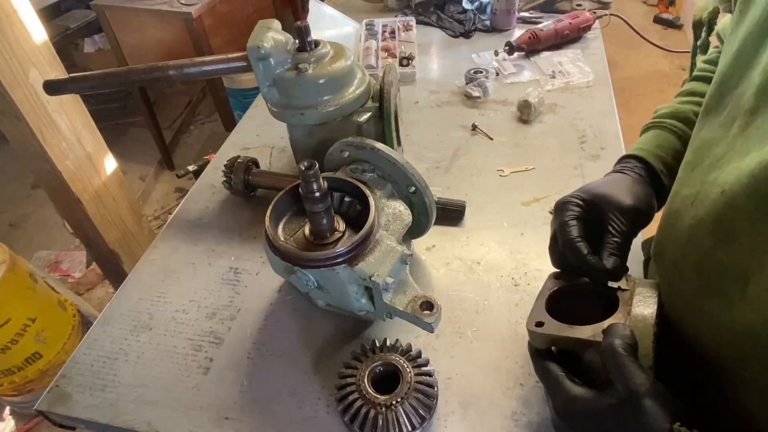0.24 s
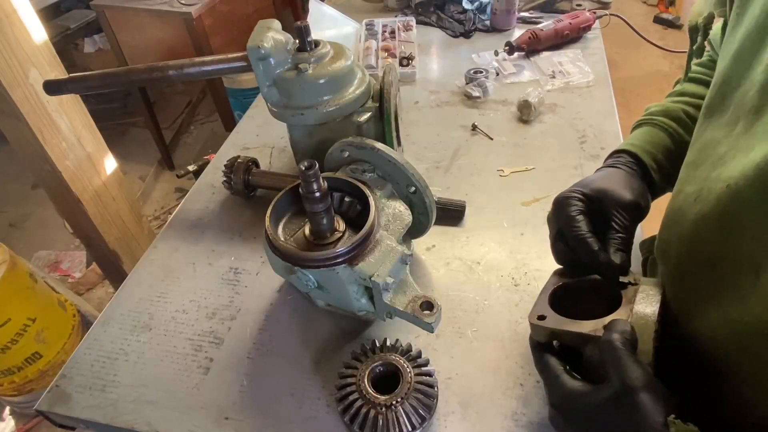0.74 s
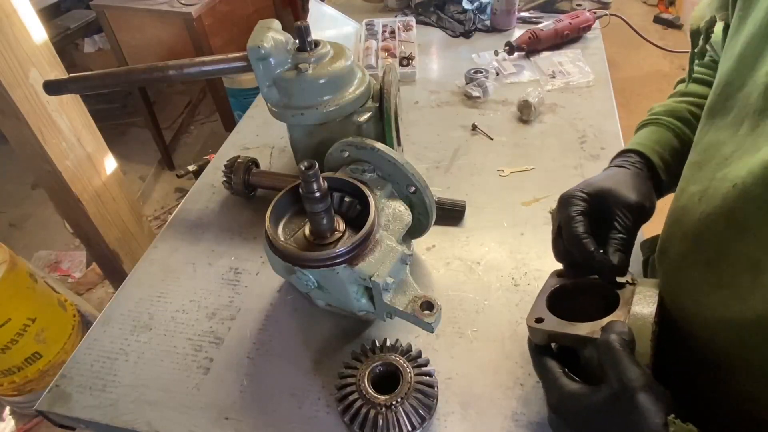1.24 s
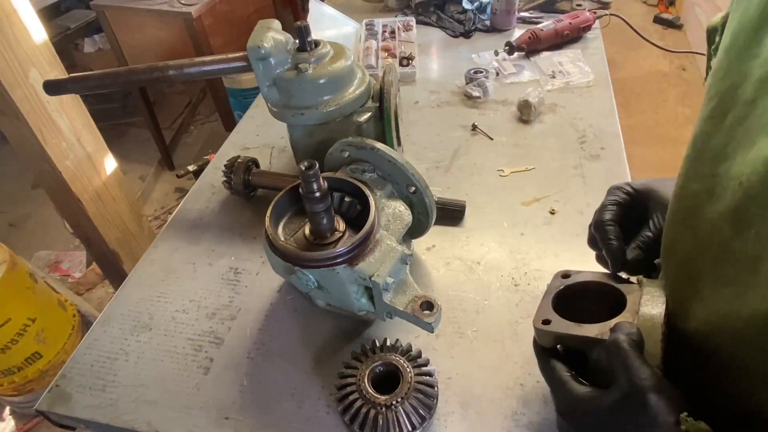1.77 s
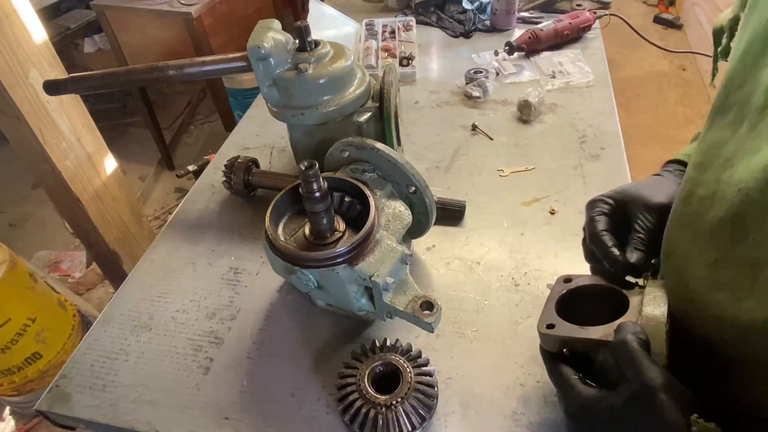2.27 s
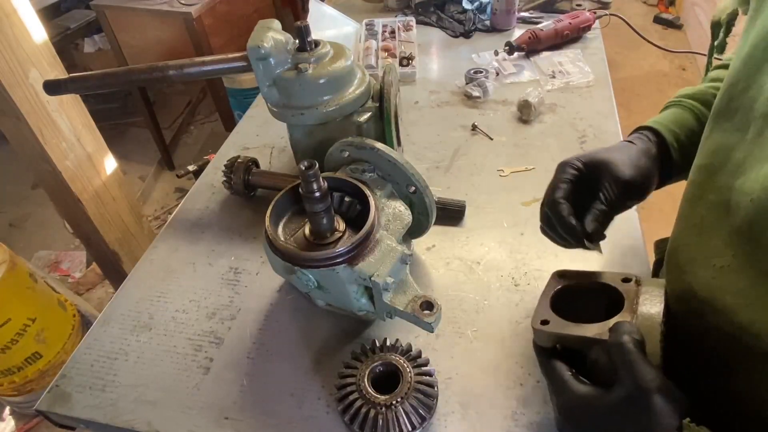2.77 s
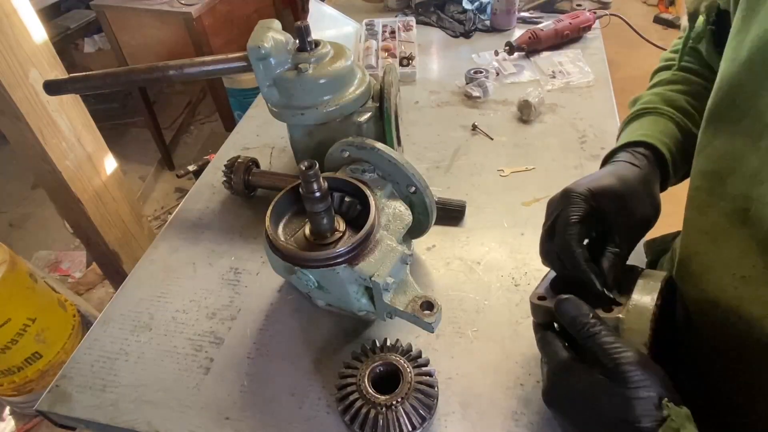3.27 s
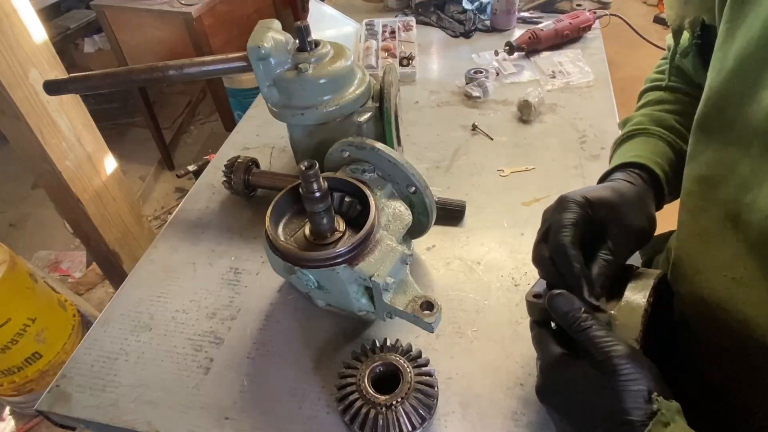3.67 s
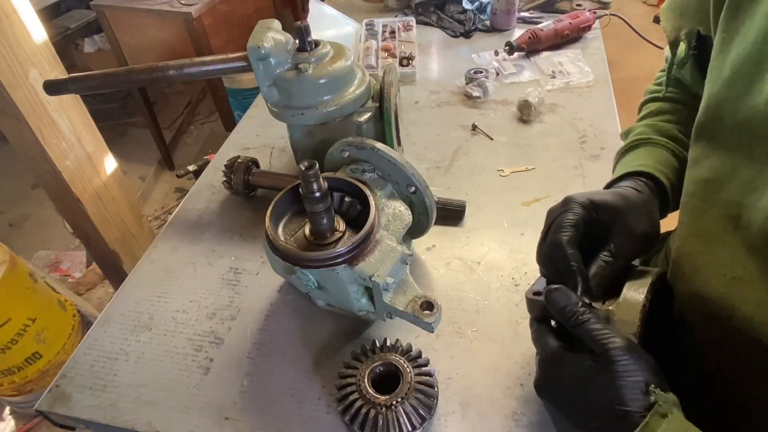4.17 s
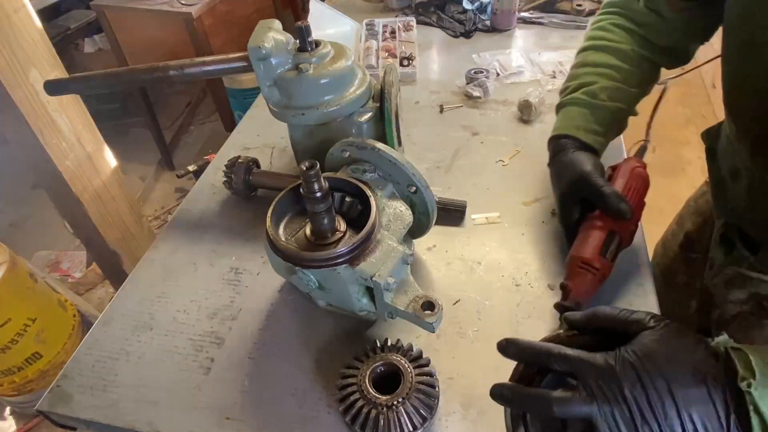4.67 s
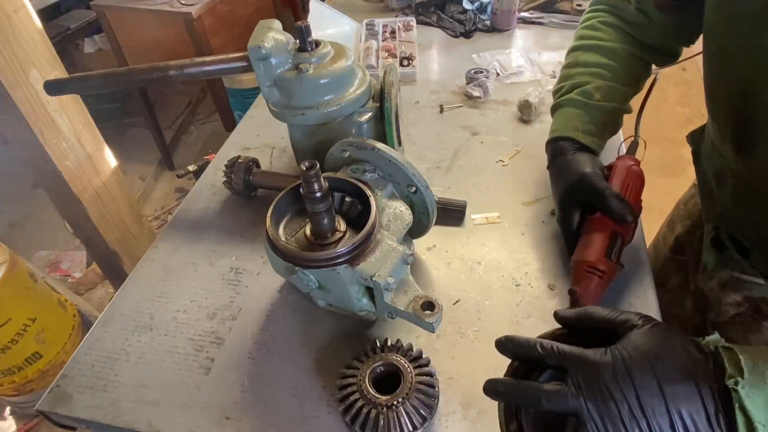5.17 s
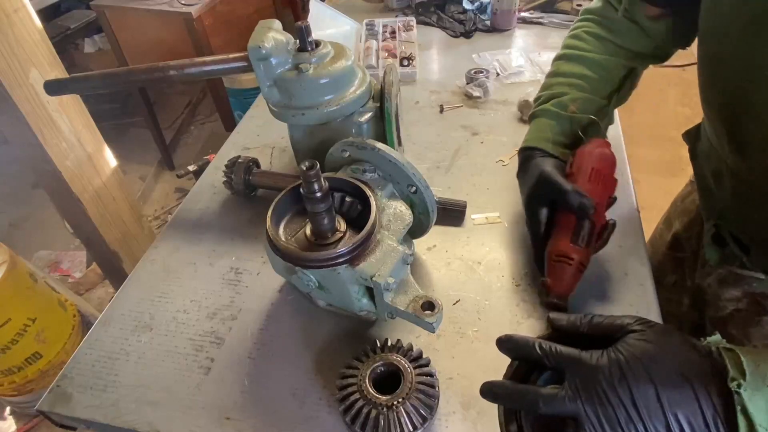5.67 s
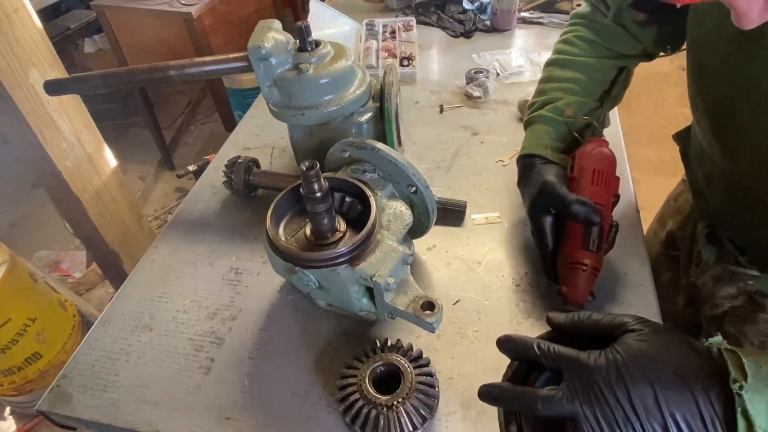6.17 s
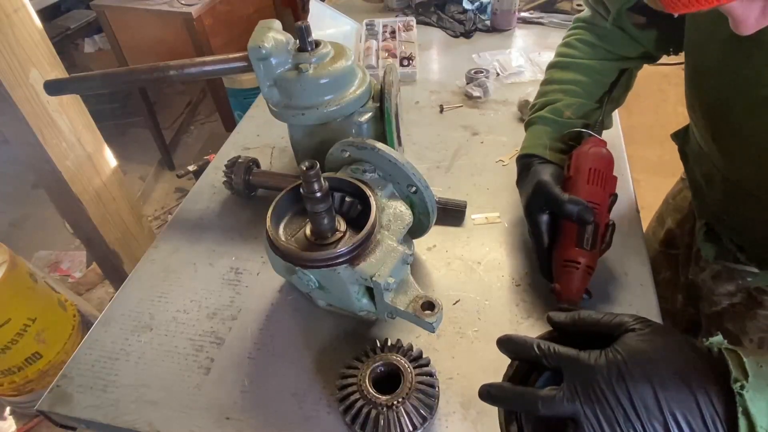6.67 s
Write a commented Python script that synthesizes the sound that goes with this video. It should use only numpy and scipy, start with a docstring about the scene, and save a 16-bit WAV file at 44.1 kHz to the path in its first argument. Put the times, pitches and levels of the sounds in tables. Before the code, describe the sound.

Scattered close clicks and faint scratching come from a blade working old gasket off an iron casting, which briefly rumbles over a sheet-metal bench. After a short slide, a switch snaps and a handheld rotary tool starts. Its motor rises in pitch through a few rattles and sharp dial clicks, then keeps whining with fan hiss and bearing chatter in the small workshop.

```python
"""Gasket picking and a rotary tool

At a sheet-metal bench a blade picks old gasket off an iron casting, which is then shoved round.
A small electric rotary tool is dragged over, clicked on and dialled up to speed. It rattles against
the bench a few times, then whines on in the small workshop: rotor slots sing in the housing
over shaft hum, fan air and bearing chatter."""
import sys
import numpy as np
from scipy import signal
from scipy.fft import rfft, irfft
from scipy.io import wavfile

SR = 44100
rng = np.random.default_rng(int(sys.argv[2]) if len(sys.argv) > 2 else 0)


def dump_mix(stems):
    """Bounce the given channels to the path in sys.argv[1] as a 16-bit WAV at rate SR."""
    frames = np.atleast_2d(stems).T  # one column per channel
    limited = np.clip(frames, -1, 1)  # hard clip at full scale
    pcm = np.round(limited * 32767).astype(np.int16)
    wavfile.write(sys.argv[1], SR, pcm)


N = 305172
T = np.arange(N) / SR

# blade picks (time [s], tick [dB], ring [dB], ring pitch [Hz], thud [dB], contact [s], tick treble [dB])
PICKS = [(0.226,-41.5,-59,3040,-58,0.0084,-15.5), (0.238,-41,-48.5,2920,-41.5,0.0014,-17),
         (0.303,-30,-44.5,2840,-42.5,0.0013,-22), (0.373,-61,-68,2870,-49.5,.002,-7),
         (0.388,-52,-66,2880,-56,0.0024,-14), (0.6307,-32.5,-38.5,2936,-38,0.0018,0.5),
         (0.644,-38,-43,2930,-71,0.0022,-10), (0.76,-36.5,-47,2940,-47,0.0015,-29),
         (1.865,-48.5,-53,2440,-45.5,0.001,10), (1.977,-32,-49,2370,-63,0.0072,-4),
         (1.9823,-32.5,-42.5,2420,-33.5,0.0014,13), (1.996,-33.5,-63,2380,-57,0.00091,3),
         (2.3567,-16,-52,2250,-71,0.00057,5.5), (2.3784,-29,-44.5,2300,-53.5,0.0015,6),
         (2.991,-43,-61,2420,-44,.001,6), (3.015,-53,-61,2130,-52,0.00087,-3),
         (3.097,-48.5,-65,2410,-64,0.006,-5), (3.341,-35.5,-47.5,3370,-53,0.00065,1),
         (3.492,-52,-60,3130,-71,0.0018,4), (3.6528,-32,-43.5,3180,-51,0.00013,7),
         (3.671,-37.5,-47,3270,-46.5,0.0036,2), (4.291,-57.5,-56,3220,-48,0.00069,22),
         (4.365,-61,-72,2980,-36,.002,0), (4.424,-56.5,-57,2930,-44,0.00073,19.5),
         (4.4806,-52,-61,2840,-80,0.00032,22.5)]
# modes of the hand-damped casting (ratio to ring pitch [-], level [dB], t60 [s])
IRON_MODES = [(0.432,-23.5,0.095), (.57,-9,0.012), (.68,-11,0.011), (0.801,-9.5,0.043), (.89,-4,0.0055),
              (.965,4,0.023), (1.004,2,0.032), (1.07,-3.5,0.011), (1.45,-29,.016), (1.668,-21,0.025),
              (2.38,-29,0.022)]
# clicks of the tool's case, switch and speed dial (time [s], level [dB], pitch [Hz])
CLICKS = [(4.817, -21.5, 6720), (4.8266, -42, 3900), (5.0266, -18, 4040), (5.494, -11, 5090),
          (5.585, -16.5, 5050), (5.6311, -10.5, 4980), (5.648, -16, 6070), (5.66, -13.5, 4920)]
SWITCH_ON_S = CLICKS[0][0]


def amp(db):
    return 10 ** (np.asarray(db) / 20)


def unit_rms(x):
    return x / np.sqrt(np.mean(x ** 2) + 1e-20)


def noise(count=N):
    return rng.standard_normal(count)


def at_hz(points, hz):
    """Interpolate (frequency, value) points over log frequency."""
    f, value = np.transpose(points)
    return np.interp(np.log(hz + 1), np.log(f + 1), value)


def curve(points):
    """Interpolate (time, value) points over the scene."""
    return np.interp(T, *np.transpose(points))


def add(mix, start_s, sound):
    part = mix[max(round(start_s * SR), 0):][:len(sound)]
    part += sound[:len(part)]


def colour(x, spectrum, size=4096):
    """Minimum-phase filter of unit energy."""
    log_gain = np.log(amp(at_hz(spectrum, abs(np.fft.fftfreq(size, 1 / SR)))))
    taps = np.fft.ifft(np.exp(np.conj(signal.hilbert(log_gain)))).real[:size // 2]
    return signal.oaconvolve(x, taps / np.linalg.norm(taps))[:len(x)]


def resonate(x, modes):
    """Mode bank of unit energy (frequency [Hz], width [Hz], level [dB])."""
    t = np.arange(SR // 4) / SR
    taps = sum(amp(db) * unit_rms(np.exp(-np.pi * width_hz * t) * np.cos(2 * np.pi * hz * t))
               for hz, width_hz, db in modes)
    return signal.oaconvolve(x, taps / np.linalg.norm(taps))[:len(x)]


def drift(knots_per_s):
    """Random wander of about unit size."""
    knots = noise(2048)
    return np.interp(T * knots_per_s, np.arange(len(knots)), knots)


def grains(per_s, spread_db):
    """Random impulses of uneven size."""
    hits = rng.random(N) < per_s / SR
    return unit_rms(hits * noise() * amp(spread_db * np.minimum(rng.exponential(1, N), 4)))


def push(start_s, rise_s, hold_s, fade_db_per_s):
    """Envelope: rise, hold until hold_s after the start, fade."""
    t = T - start_s
    return np.clip(t / rise_s, 0, 1) * amp(-fade_db_per_s * np.maximum(t - hold_s, 0))


def swells(strokes):
    """Envelope: one Hann bump per stroke."""
    envelope = np.zeros(N)
    for start_s, length_s, db in strokes:
        add(envelope, start_s, amp(db) * np.hanning(int(length_s * SR)))
    return envelope


def soft_step(x, edge, width):
    return .5 + .5 * np.tanh((x - edge) / width)


def speed_gain(speed_hz, power, fade_in_s=0.084):
    """Fade in at switch-on, then follow a power of shaft speed."""
    return np.clip((T - SWITCH_ON_S) / fade_in_s, 0, 1) * (speed_hz / speed_hz.max()) ** power


def stereo(direct, left, right, wet_db):
    """Direct sound arrives first on the right; room sound is coherent only in the bass."""
    # left-right lag and level difference of the two microphones
    # (frequency [Hz], left lag [rad], left minus right [dB])
    mic_differences = [(100, 0.5, 0), (650, 1.53, 0.5), (926, 1.77, -4), (1400, 1, -0.5),
                       (2240, 0.18, -2.7), (2920, 1.13, -0.5), (3700, 1.35, -0.5), (4300, 1.4, 6),
                       (5300, 3.5, 7.5), (6000, 4, 2), (6520, 4.5, -4), (8100, 8, 9.5), (8770, 8.5, -0.5),
                       (9290, 8, -10.5), (9930, 12, 1), (10800, 13.5, 0), (12860, 13, 3), (16000, 17, -9)]
    hz = np.fft.rfftfreq(N, 1 / SR)
    coherence = np.exp(-(hz / 520) ** 2)
    right = irfft(coherence * rfft(left) + np.sqrt(1 - coherence ** 2) * rfft(right), N)
    lag_rad = at_hz([(f, rad) for f, rad, _ in mic_differences], hz)
    lean = amp(at_hz([(f, db) for f, _, db in mic_differences], hz))
    response = np.array([lean * np.exp(-1j * lag_rad), np.ones(len(hz))]) * np.sqrt(2 / (1 + lean ** 2))
    near = irfft(rfft(direct) * response, N)
    return (near + amp(wet_db) * np.array([left, right])) / np.sqrt(1 + amp(wet_db) ** 2)


def diffuse(source, wet_db):
    """Lasting noise in the room: separate draws for direct, left and right."""
    return stereo(source(), source(), source(), wet_db)


def in_room(x, wet_db, patterns=3):
    """Workshop echoes; the pattern shifts as the hands move."""
    # room decay (frequency [Hz], t60 [s])
    decay = [(100, 0.51), (500, 0.36), (2000, 0.32), (6000, 0.21), (15000, 0.0067)]
    shape = (patterns, 2, SR // 3)
    taps = rng.standard_normal(shape) * (rng.random(shape) < .12)
    hz, t, spectra = signal.stft(taps, SR, nperseg=256)
    early = 1 + 2 * np.exp(-t / 0.0048)  # early echoes off bench and parts
    tails = signal.istft(spectra * early * amp(-60 * t / at_hz(decay, hz)[:, None]), SR, nperseg=256)[1]
    tails[..., :SR // 700] = 0
    tails /= np.linalg.norm(tails, axis=-1, keepdims=True)
    share = np.sqrt(2 / patterns) * np.cos(np.pi * (T * 0.6076 + np.arange(patterns)[:, None] / patterns))
    wet = signal.oaconvolve((x * share)[:, None], tails, axes=2).sum(0)[:, :N]
    return stereo(x, *wet, wet_db)


def room_tone(level_db=-62):
    """Low room rumble under a trace of hiss."""
    # background spectrum (frequency [Hz], density [dB])
    spectrum = [(15, -70), (30, -13), (62, 3), (100, -11.5), (140, -20.5), (370, -31.5), (650, -37),
                (1100, -41), (5500, -45), (11000, -48.5), (15000, -73)]
    return diffuse(lambda: colour(noise(), spectrum), wet_db=28) * amp(level_db + 0.27 * drift(1))


def rubbing(rest_db=-87, stroke_gain_db=1):
    """Blade and glove rub the iron in tiny slips; the fingers never quite rest."""
    # strokes over the iron (start [s], length [s], level [dB])
    strokes = [(0.188, 0.2, -83), (2.04, 0.41, -71.5), (2.582, 0.088, -73), (2.839, 0.034, -61.5),
               (2.867, 0.072, -67), (2.935, 0.063, -57), (2.972, 0.079, -62.5), (2.997, 0.3, -73.5),
               (3.189, 0.17, -65), (3.39, 0.29, -66.5), (4.19, 0.049, -70.5), (1.112, 0.076, -81),
               (1.48, 0.11, -85.5), (3.817, 0.62, -79)]
    # friction spectrum (frequency [Hz], density [dB])
    rasp = [(300, 4.5), (1500, -3), (3000, -3), (4500, -8), (7000, -5.5), (9000, -14), (11000, -5),
            (13000, -28.5), (16000, -33)]
    pressure = amp(rest_db + 3 * drift(22.98)) + amp(stroke_gain_db) * swells(strokes)
    pressure *= amp(2.5 * drift(24.27))
    return pressure * diffuse(lambda: colour(grains(1800, 0.98), rasp), wet_db=6)


def blade_picks(tick_gain_db=-2, ring_gain_db=1, thud_gain_db=-1, spot_db=1.5, boom_hz=82):
    """The blade snaps off an edge: tick, short ring of the iron, thud and boom of the bench."""
    # spectra of blade tick and bench thud (frequency [Hz], density [dB])
    tick_spectrum = [(200, -22.5), (600, 8.5), (1000, 4.5), (1500, 0), (2300, 3.5), (3500, -1.5),
                     (6500, -1.5), (9000, -8), (12000, -4.5), (16000, -59)]
    thud_spectrum = [(30, -19), (80, -1), (250, 0.5), (450, -6.5), (800, -21), (2000, -37), (6000, -66)]
    ticks, rings, thuds = np.zeros((3, N))
    t = np.arange(SR // 4) / SR
    highpass = signal.butter(1, 5000, "high", fs=SR)
    blow = np.exp(-t / 0.0094) * (1 - np.exp(-t / 0.0048))
    boom = np.sin(2 * np.pi * boom_hz * t) * np.exp(-t / 0.027) * (1 - np.exp(-t / 0.034))
    for start_s, tick_db, ring_db, ring_hz, thud_db, contact_s, treble_db in PICKS:
        slip = np.exp(-t / contact_s) + 0.016 * np.exp(-t / 0.044)  # snap, then crumbs
        slip *= (1 - np.exp(-t / (0.46 * contact_s))) * np.sign(noise(len(t)))
        tick = slip + (amp(treble_db) - 1) * signal.lfilter(*highpass, slip)
        add(ticks, start_s, amp(tick_db + tick_gain_db) * tick)
        # each blow hits another spot, so mode levels vary
        ring = sum(amp(db + spot_db * rng.normal() - 60 * t / t60_s)
                   * np.sin(2 * np.pi * (ring_hz * ratio * t + rng.random()))
                   for ratio, db, t60_s in IRON_MODES)
        add(rings, start_s, amp(ring_db + ring_gain_db) * ring * (1 - np.exp(-t / 0.00036)))
        thud = unit_rms(colour(noise(len(t)) * blow, thud_spectrum)) * np.sqrt(np.mean(blow ** 2))
        add(thuds, start_s, amp(thud_db + thud_gain_db) * (thud + amp(-5) * boom))
    ticks = colour(ticks, tick_spectrum)
    return in_room(ticks, wet_db=-7) + in_room(rings, wet_db=-12.5) + in_room(thuds, wet_db=1.5)


def blade_twang(peak_db=-8, slope_db_per_db=1.8):
    """The thin steel blade flicks free and twangs, faintly on all but hard picks."""
    # blade modes (frequency [Hz], width [Hz], level [dB])
    modes = [(4930, 290, -18), (5400, 560, 1), (6460, 140, -0.5)]
    snaps = np.zeros(N)
    hardest_db = max(pick[1] for pick in PICKS)
    for start_s, tick_db, *_ in PICKS:
        add(snaps, start_s, amp([peak_db + slope_db_per_db * (tick_db - hardest_db)]))
    return in_room(resonate(snaps, modes), wet_db=1)


def casting_shoves(gain_db=-2.5, uneven_db=2.5):
    """The casting slips and rumbles over the bench."""
    # shoves (start [s], hold [s], level [dB])
    shoves = [(2.465, 0.055, -50.6), (2.626, 0.046, -57.4), (2.722, 0.09, -36.4)]
    # rumble spectrum (frequency [Hz], density [dB])
    spectrum = [(24, -10), (40, -15), (93, 1.5), (167, -11), (234, -7), (344, -16.5), (912, -29),
                (1200, -33.5), (4070, -63), (6410, -58), (9000, -67), (11700, -85), (19800, -120)]
    force = sum(amp(db) * push(start_s, 0.035, hold_s, fade_db_per_s=39) for start_s, hold_s, db in shoves)
    rumble = diffuse(lambda: colour(grains(2500, 2.6), spectrum), wet_db=7.5)
    return rumble * force * amp(gain_db + uneven_db * drift(25.23))


def sleeve_scuff(level_db=-58.5):
    """Cloth catches on the last shove and slides to rest."""
    # cloth spectrum (frequency [Hz], density [dB])
    spectrum = [(200, -14), (1200, 4), (2500, -3), (5200, -12), (6500, -28), (12000, -43)]
    envelope = push(start_s=2.729, rise_s=0.012, hold_s=0.068, fade_db_per_s=80)
    return diffuse(lambda: colour(grains(4000, 1.5), spectrum), wet_db=8) * envelope * amp(level_db)


def gasket_crumbs(ring_hz=2450, crumbs_per_s=450):
    """Crumbs break under the blade, each a tiny tick on the iron."""
    # grating strokes (start [s], length [s], level [dB])
    strokes = [(2.954, 0.16, -74), (3.196, 0.29, -71.5)]
    modes = [(ratio * ring_hz, 2.2 / t60_s, db) for ratio, db, t60_s in IRON_MODES]
    return in_room(resonate(grains(crumbs_per_s, 2.6) * swells(strokes), modes), wet_db=3)


def tool_drag(gain_db=1.5):
    """The tool slides on the bench: one pull, then a nudge as the switch is pressed."""
    # slides (start [s], hold [s], level [dB])
    slides = [(4.543, 0.097, -28), (4.77, 0.074, -49)]
    # sliding spectrum (frequency [Hz], density [dB])
    spectrum = [(59, -52), (100, -31.5), (217, 5), (262, -13.5), (462, 0), (885, -4.5), (1530, 3),
                (1960, -6), (2630, -3.5), (11200, -21), (12400, -32), (13200, -34), (15000, -37)]
    force = sum(amp(db) * push(start_s, 0.068, hold_s, fade_db_per_s=220) for start_s, hold_s, db in slides)
    return diffuse(lambda: colour(grains(6000, 2.3), spectrum), wet_db=14) * force * amp(gain_db)


def case_clicks(gain_db=14, cutoff_hz=8000):
    """Switch and dial detents snap in the plastic case."""
    # case modes (ratio to click pitch [-], width [Hz], level [dB])
    case_modes = [(.42, 613, 4), (.8, 500, 0), (1, 225, 15), (1.25, 350, 9.5)]
    clicks, snap = np.zeros(N), signal.unit_impulse(SR // 20)
    for start_s, click_db, pitch_hz in CLICKS:
        modes = [(ratio * pitch_hz, width_hz, db) for ratio, width_hz, db in case_modes]
        add(clicks, start_s, amp(click_db + gain_db) * resonate(snap, modes))
    return in_room(signal.lfilter(*signal.butter(2, cutoff_hz, fs=SR), clicks), wet_db=-1)


def shaft_motion(kick_hz=70, surge_hz=120):
    """Shaft speed, shaft angle and the current surge of each mains half cycle."""
    # run-up (time [s], shaft speed [Hz])
    run_up = [(5.0, 120), (5.1, 150), (5.2, 184), (5.24, 195), (5.32, 197), (5.4, 209), (5.5, 231),
              (5.7, 280), (5.8, 298), (5.87, 294), (6, 302), (6.15, 311.3), (6.3, 318.6), (6.92, 326.2)]
    speed_hz = curve([(SWITCH_ON_S, kick_hz), *run_up])
    angle_rad = 2 * np.pi * np.cumsum(speed_hz * (1 + 0.0013 * drift(45))) / SR
    surge = unit_rms(np.exp(1.8 * np.cos(2 * np.pi * surge_hz * T)))
    return speed_hz, angle_rad, surge


def shaft_whirr(speed_hz, angle_rad, weak_order_db=-59):
    """Unbalance hums at shaft rate and its octave; higher orders grow with speed and flutter more."""
    # hum and its octave as the tool is moved (time [s], level [dB])
    hum_levels = [(5.0, -70), (5.45, -45), (5.72, -55.5), (5.85, -45), (6.0, -41), (6.12, -54.5),
                  (6.25, -47.5), (6.38, -57.5), (6.5, -48.5), (6.6, -42.5), (6.9, -43)]
    octave_levels = [(5.0, -62), (5.7, -56), (6.0, -51.5), (6.55, -50.5), (6.75, -38.5), (6.85, -50)]
    # prominent orders (multiple of shaft speed [-]) and their strengths (level [dB])
    strong_orders = (3, 4, 5, 6, 7, 10, 11, 15, 17, 18, 21, 22, 26, 27, 31, 32)
    strong_db = [-50, -50, -47, -44, -47, -47, -51, -50, -50, -48, -52, -53, -52, -52, -54, -53]
    # shell resonances the orders sweep through (frequency [Hz], width [Hz], lift [dB])
    shell_modes = [(938, 47, 6), (1523, 66, 11.5), (5600, 400, 6.5), (8100, 820, 6), (9710, 270, 10.5)]
    hum = sum(amp(curve(levels) + 1.7 * drift(18)) * np.cos(order * angle_rad)
              for order, levels in enumerate((hum_levels, octave_levels), 1))
    order_db = dict.fromkeys(range(3, 40), weak_order_db) | dict(zip(strong_orders, strong_db))
    whirr = np.zeros(N)
    for order, db in order_db.items():
        lift_db = sum(peak_db / (1 + (2 * (order * speed_hz - hz) / width_hz) ** 2)
                      for hz, width_hz, peak_db in shell_modes)
        flutter_rad = 0.0067 * order * drift(90) + rng.uniform(0, 2 * np.pi)
        waver_db = -1.5 * order / (order + 2) * drift(22)
        whirr += amp(db + lift_db + waver_db) * np.cos(order * angle_rad + flutter_rad)
    return np.sqrt(2) * (hum * speed_gain(speed_hz, power=0.41) + whirr * speed_gain(speed_hz, power=2.05))


def motor(speed_hz, angle_rad, surge, slots=8, whine_db=-20, whistle_db=-40, split_hz=2447):
    """Rotor slots, pulsed by the mains, whine in the housing and whistle over the shaft's whirr."""
    # housing resonances driven by the slots (frequency [Hz], width [Hz], level [dB])
    modes = [(2190, 120, -20.5), (2494, 62, 4.5)]
    # uneven swell of the whine (time [s], level [dB])
    swell = [(5.55, 5), (5.7, 5), (5.81, -0.5), (5.87, -4.5), (5.96, 3.5), (6.05, -2), (6.1, 1),
             (6.155, -7.5), (6.2, -2), (6.3, -0.5), (6.5, 1), (6.66, 2), (6.76, -3), (6.83, -6)]
    current = 1 - 0.948 * soft_step(speed_hz, edge=323, width=9.9)  # eases near full speed
    octave = np.cos(2 * slots * angle_rad)
    buzz = surge * (np.cos(slots * angle_rad) + amp(-3) * octave)
    whine = sum((-1) ** k * amp(db) * signal.lfilter(*signal.iirpeak(hz, hz / width_hz, SR), buzz)
                for k, (hz, width_hz, db) in enumerate(modes))
    whine = signal.sosfilt(signal.butter(16, split_hz, fs=SR, output="sos"), whine)
    whine *= speed_gain(speed_hz, power=1.1) * current ** 0.67
    whine *= amp(whine_db + curve(swell) + 1.5 * drift(60))
    whistle = amp(whistle_db) * octave * speed_gain(speed_hz, power=-0.27) * current
    whistle *= (0.88 + 0.12 * surge) * amp(3.1 * drift(35))
    whistle *= 1 + 0.6 * drift(260)  # roughness
    whistle = signal.sosfilt(signal.butter(8, split_hz, "high", fs=SR, output="sos"), whistle)
    return in_room(shaft_whirr(speed_hz, angle_rad) + whistle, wet_db=-13) + in_room(whine, wet_db=-7)


def fan_air(speed_hz, angle_rad, level_db=-31, ripple=0.14):
    """Broad fan noise, rippling once a turn."""
    # air spectrum (frequency [Hz], density [dB])
    spectrum = [(20, -42), (90, -59), (170, -41), (300, -16.5), (520, -18), (800, -13), (1200, -8),
                (2500, -2.5), (2900, -7), (3700, -4.5), (4400, -9.5), (5400, -5.5), (5900, -8),
                (6200, -5.5), (6800, -5), (8100, -11.5), (9400, -9), (10600, -13.5), (11200, -9.5),
                (12300, -18.5), (12900, -20.5), (15500, -27.5)]
    air = diffuse(lambda: colour(noise() * (1 + ripple * np.cos(angle_rad)), spectrum), wet_db=-3)
    return air * speed_gain(speed_hz, power=0.58) * amp(level_db + 0.98 * drift(50))


def bearing_chatter(speed_hz, surge, level_db=-36, critical_hz=254, calm_db=-10):
    """Bearings and brushes rattle the housing with each surge, less below a critical speed."""
    # housing modes (frequency [Hz], width [Hz], level [dB])
    modes = [(1094.5, 35, 25), (1534, 190, 28.5), (1765, 130, 21), (2023, 140, 25.5), (2310, 40, -13),
             (3833, 41, 24.5)]
    knocks = grains(7000, 4.5) * (0.06 + 0.94 * surge)
    calm = 1 - soft_step(speed_hz, critical_hz, width=3.3)
    gain = speed_gain(speed_hz, power=0.38) * amp(level_db + calm_db * calm + drift(30))
    return in_room(resonate(knocks, modes) * gain, wet_db=0.5)


def bench_rattle(angle_rad, rattle_gain_db=-2, drum_hz=244, drum_t60_s=0.22):
    """The running tool touches the bench, hops once a turn and sets the sheet metal drumming."""
    # contacts (start [s], length [s], rattle [dB], drumming [dB])
    contacts = [(5.016, 0.044, -27.5, -32.5), (5.236, 0.02, -30, -42), (5.257, 0.085, -27, -46),
                (5.41, 0.035, -55, -48), (5.425, 0.066, -39, -35.5), (5.573, 0.06, -36, -43),
                (5.798, 0.066, -35.5, -30)]
    # hard landings of the tool's nose (time [s], level [dB])
    knocks = [(5.0265, -4.5), (5.261, 3), (5.2647, 0.5), (5.433, -10)]
    # rattle spectrum (frequency [Hz], density [dB])
    spectrum = [(50, -52), (90, -2), (150, -12.5), (300, -14.5), (700, -7.5), (1300, -13.5), (1700, -5.5),
                (2030, 5.5), (2380, 0), (3200, -17.5), (6000, -12.5), (12000, -16), (16000, -35)]
    hop_force, drum_force = np.zeros((2, N))
    for start_s, length_s, rattle_db, drum_db in contacts:
        pressure = signal.windows.tukey(int(length_s * SR), .1)
        settling = np.geomspace(1.4, .6, len(pressure))
        add(hop_force, start_s, amp(rattle_db + rattle_gain_db) * pressure * settling)
        add(drum_force, start_s, amp(drum_db) * pressure)
    turns = angle_rad / (2 * np.pi) + .07 * drift(200)
    new_turn = np.diff(np.floor(turns), prepend=0) > 0
    hops = hop_force * unit_rms(new_turn * np.sign(noise()) * amp(2 * noise()))
    for start_s, db in knocks:
        add(hops, start_s, amp([db]))
    pole = amp(-60 / (drum_t60_s * SR))
    drum_envelope = signal.lfilter([1 - pole], [1, -pole], drum_force * amp(2 * drift(70)))
    drum = drum_envelope * np.sqrt(2) * np.sin(2 * np.pi * drum_hz * T)
    return in_room(colour(hops, spectrum), wet_db=2) + drum


def scene():
    speed_hz, angle_rad, surge = shaft_motion()
    tool = motor(speed_hz, angle_rad, surge) + fan_air(speed_hz, angle_rad)
    tool += bearing_chatter(speed_hz, surge) + bench_rattle(angle_rad) + case_clicks()
    handwork = blade_picks() + gasket_crumbs() + sleeve_scuff() + casting_shoves() + tool_drag() + rubbing()
    balance = amp([[-.4], [.4]])
    return (tool + handwork + room_tone() + blade_twang()) * balance


def record(dry, cutoff_hz=15900):
    """Steep low-pass."""
    taps = signal.firwin(511, cutoff_hz, window=("kaiser", 9), fs=SR)
    return signal.oaconvolve(dry, taps[None], "same")


dry = scene()
out = record(dry)
dump_mix(out)
```